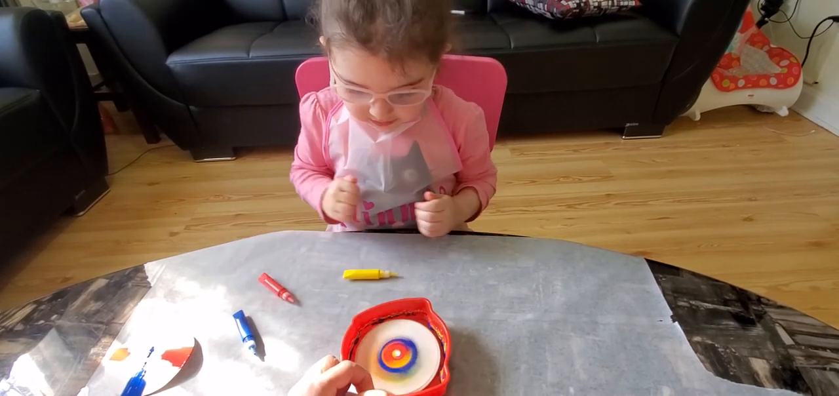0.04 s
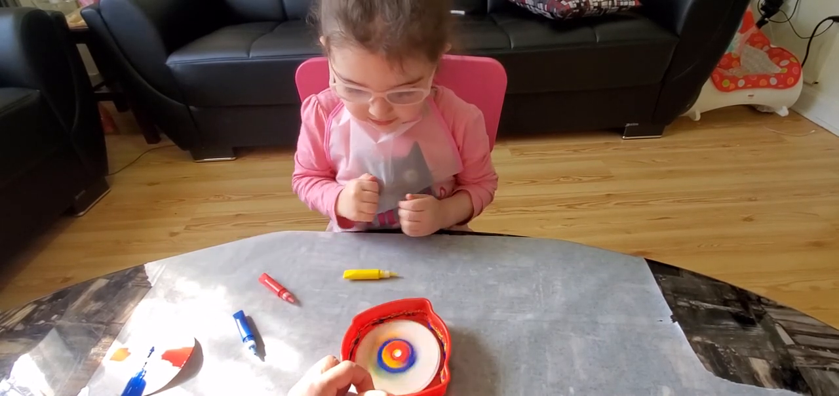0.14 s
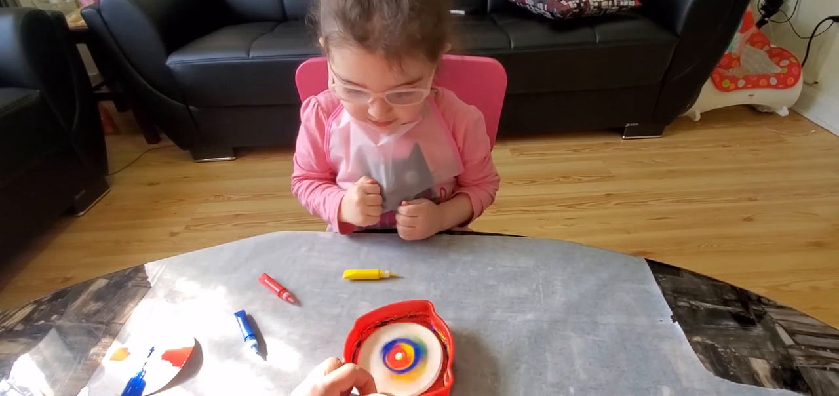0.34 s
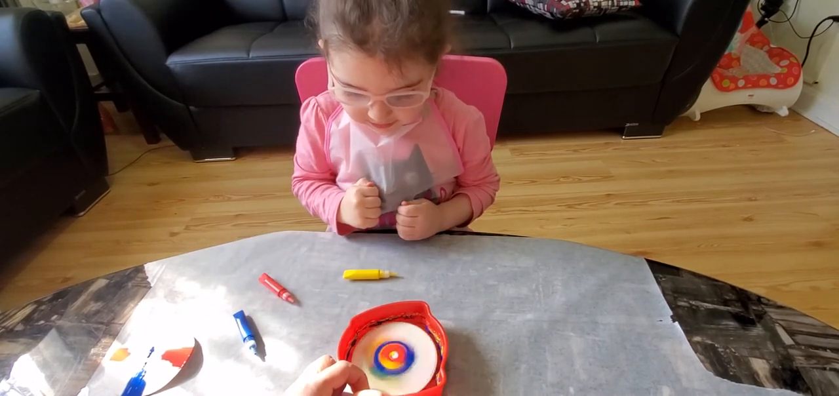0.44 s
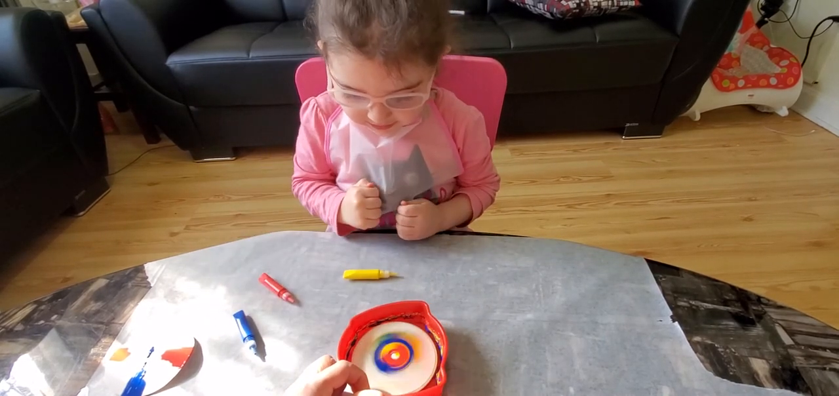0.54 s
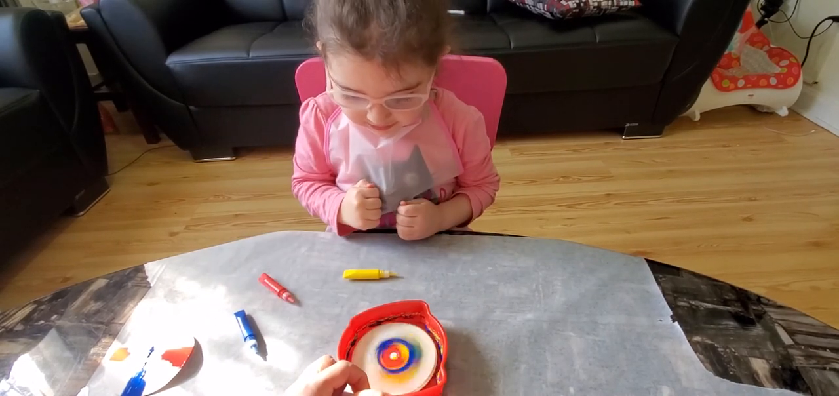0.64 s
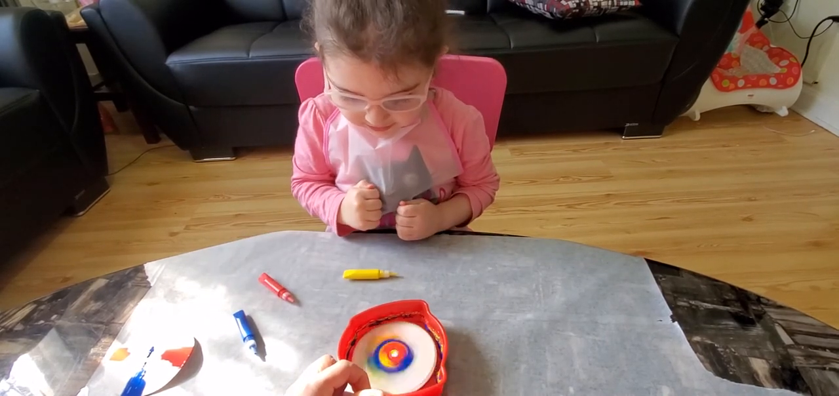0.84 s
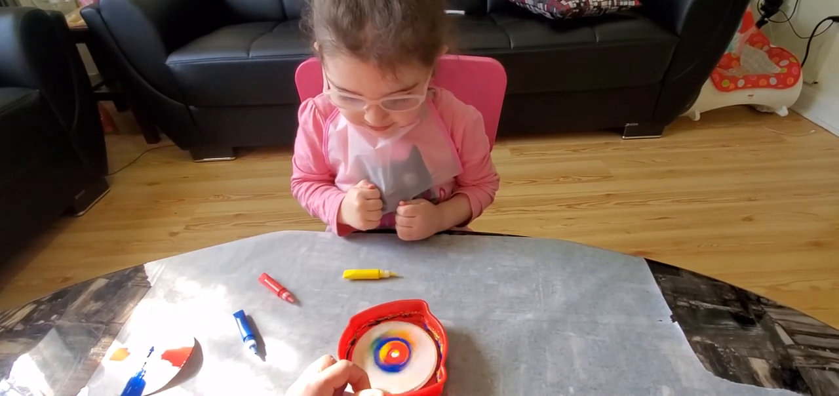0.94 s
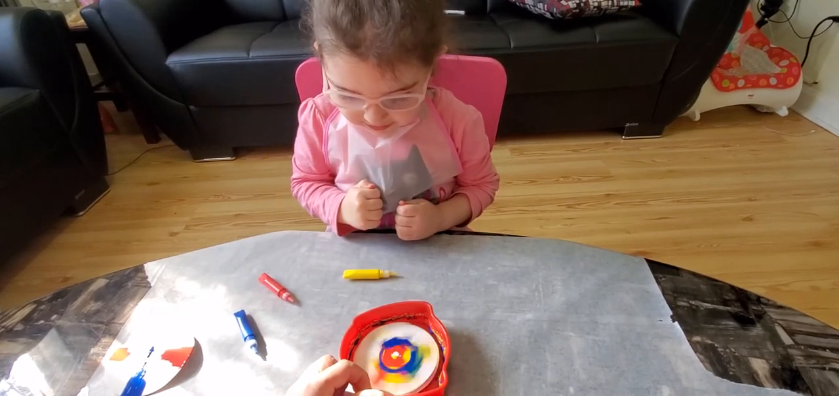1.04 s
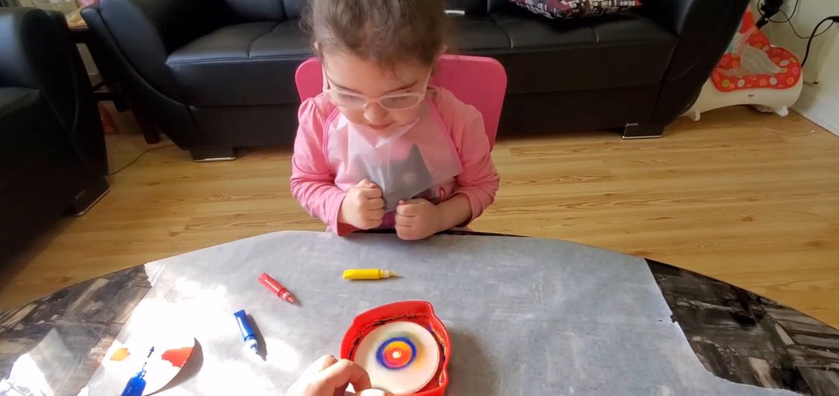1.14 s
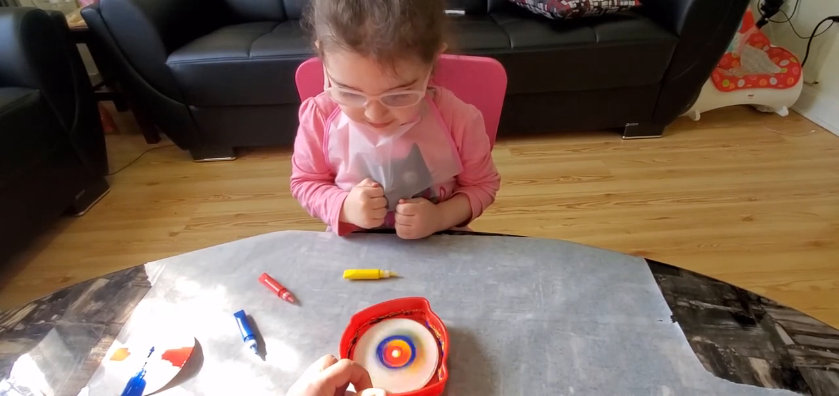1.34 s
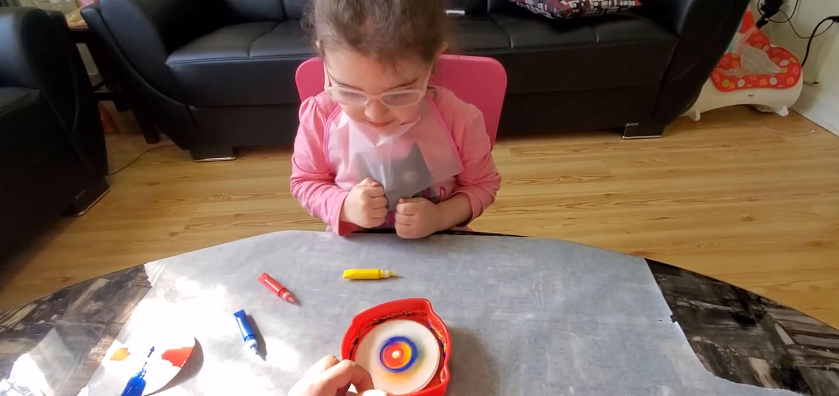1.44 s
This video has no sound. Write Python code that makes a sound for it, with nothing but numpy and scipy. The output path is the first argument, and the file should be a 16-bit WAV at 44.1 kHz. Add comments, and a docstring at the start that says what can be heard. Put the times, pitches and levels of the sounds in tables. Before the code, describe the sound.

A plastic spinning toy ticks faintly, close by in a quiet room. At about 0.2 seconds it gives a quick ratcheting rattle, then a sharp chattering clack at 0.35. Light ticks and a faint whir follow. Near 0.9 seconds it scrapes and ratchets again, ending in a snap and lighter clack around 1.1. The table thumps softly under both strokes, and faint ticking and whirring continue to about 1.5 seconds.

```python
"""Plastic spin-art toy

A plastic spin-art toy is driven twice on a table in a living room. Each stroke scrapes, a pawl rattles
over ratchet teeth that slow to a stop, and the drive clacks home. The table booms under the strokes, and
the card holder ticks and whirs in its loose bearing. Rough contact forces, made of shaped noise, ring
the plastic shell; decaying sines make the table; fading noise makes the room, over a faint hush.
"""
import sys
import numpy as np
from scipy import signal
from scipy.fft import rfft, irfft
from scipy.io import wavfile
from scipy.ndimage import map_coordinates

SR = 44100
rng = np.random.default_rng(int(sys.argv[2]) if len(sys.argv) > 2 else 0)


def to_wav(s):
    """Save 16-bit WAV."""
    ch = np.atleast_2d(s).T  # columns
    pcm = np.round(np.clip(ch, -1, 1) * 32767)  # PCM
    wavfile.write(sys.argv[1], SR, pcm.astype(np.int16))


N = 66150  # samples, 1.5 s

# level of the bearing's whir: time_s, level_db
WHIR_LEVEL = [(0, -56.5), (.17, -58.5), (.5, -55.5), (.6, -68), (.72, -54), (.84, -70.5), (1.0, -40.5),
              (1.27, -56.5), (1.34, -55.5), (1.4, -49.5), (1.45, -57.5), (1.5, -48)]
# the drive slides before it catches: start_s, end_s, level_db, rise_s
SLIDES = [(.196, .204, -37, .006), (.868, .941, -35.5, .04), (1.070, 1.135, -34.5, .022)]
# light knocks of the loose holder: start_s, level_db
HOLDER_TICKS = [(.003, -45.5), (.0164, -45), (.0573, -87), (.0952, -50), (.1131, -49.5), (.183, -47.5),
                (.504, -37), (.6252, -50.5), (.634, -49.5), (.6436, -45), (.6571, -49), (.6681, -42),
                (.691, -51), (.702, -42.5), (.7135, -56), (.7244, -43), (.7379, -39.5), (.8457, -54),
                (.8595, -56), (.8696, -50.5), (1.1192, -34), (1.2528, -55), (1.2887, -41.5), (1.3126, -43),
                (1.363, -43.5), (1.3914, -49), (1.4079, -55.5), (1.427, -47.5), (1.4578, -47),
                (1.4807, -46.5)]
# pushes on the table: start_s, relative_level_db, hardness_db_per_octave
TABLE_PUSHES = [(0.201, -64, -7), (0.221, -60, -6), (0.347, -49.5, -1), (0.394, -47, -12), (.895, -54, -17),
                (.940, -41, 2.5), (0.974, -44, 11), (1.143, -44.5, -12.5)]
# modes of the table top: pitch_hz, t60_s, relative_level_db
TABLE_MODES = [(68, 0.21, -23), (149.2, 0.26, -3.5), (169.2, 0.26, 2), (251, 0.092, -5), (332.5, .2, -9.5),
               (361.5, 0.34, -10)]
# ratchet runs: first_tooth_s, time_to_standstill_s, travel_teeth
RATCHET_RUNS = [(.2038, .0706, 10.15), (.9413, .0728, 7.35)]
# loudness of each run: level_db, change_over_run_db
RUN_LEVELS = [(-18, 4), (-21.5, 1.5)]
# the pawl drops over a single tooth: start_s, level_db
SINGLE_SNAPS = [(1.0098, -27), (1.1090, -19.5)]
# the drive hits its stop and chatters: start_s, level_db
STOP_CLACKS = [(.3326, -17.5), (.3358, -18), (.3396, -16.5), (.3432, -21.5), (.3468, -10.5), (.3500, -26),
               (.3675, -32), (1.1410, -22.5), (1.1442, -24.5)]

# resonances of the plastic shell: pitch_hz, t60_s, relative_level_db
SHELL_MODES = [(1235, .09, 5), (1620, .08, 3), (1806, .13, 10), (1878, .13, 9), (1968, .08, 5),
               (2400, .05, -2), (2677, .08, 3), (2852, .08, 6), (3270, .07, 1), (3650, .07, 2)]
# tone colour of the ratchet teeth: frequency_hz, relative_level_db
TOOTH_COLOUR = [(30, -28), (110, -25.5), (200, -16), (350, -23), (650, -22), (1100, -4.5), (1800, 3),
                (2300, 1.5), (3000, 2.5), (4700, -1), (5600, -0.5), (7800, -9.5), (8900, -18.5),
                (12000, -16.5)]
# tone colour of the clacks: frequency_hz, relative_level_db
CLACK_COLOUR = [(30, -55), (120, -38), (300, -25), (650, -19), (1300, -3), (2200, -3), (3400, 1),
                (5600, -3), (8300, -9), (9300, -20), (12000, -22)]
# tone colour of the ticks: frequency_hz, relative_level_db
TICK_COLOUR = [(30, -57), (120, -27.5), (350, -12), (700, -13.5), (1200, -3.5), (2000, -3.5), (3000, -10),
               (6000, -8.5), (8000, -18), (9300, -33.5), (12000, -25)]
# tone colour of the rubbing: frequency_hz, relative_level_db
SCRAPE_COLOUR = [(30, -39), (120, -16.5), (350, -13), (650, -13.5), (1200, -3), (2100, -2.5), (3000, -8),
                 (5600, -12.5), (8000, -18.5), (9300, -29), (12000, -17.5)]
# tone colour of the quiet room: frequency_hz, relative_level_db
HUSH_COLOUR = [(25, -6), (60, 6.5), (110, -17), (160, 10), (300, -17), (1000, -8.5), (5000, -35.5),
               (15500, -27)]
# extra treble of hard contacts, at unit force: frequency_hz, relative_level_db
CRACK_COLOUR = [(2000, -28.5), (5000, -9), (9000, 6), (15000, 19.5)]
# balance of the toy between the sides: frequency_hz, left_minus_right_db
LEFT_BALANCE = [(300, 0), (500, -2), (1000, 6), (1800, 3), (3000, -3), (4500, -1), (7000, 1), (10000, 5),
                (15000, 8)]
# likeness of left and right noise: frequency_hz, likeness (1 = the same)
STEREO_LIKENESS = [(150, 0.96), (300, 0.88), (600, 0.57), (1500, 0.1), (4000, 0.24), (12000, 0.15)]
# decay of the reverberation: frequency_hz, t60_s
ROOM_DECAY = [(150, 0.86), (1000, 0.35), (2000, 0.46), (4000, 0.35), (8000, 0.32), (15000, 0.27)]

BITE_DB, GRAZE_DB = 3, -5  # the first tooth bites hard and throws the pawl, which only grazes the second
TOOTH_ATTACK_S, CLACK_ATTACK_S, TICK_ATTACK_S = .0003, .0004, .0005
TOOTH_HOLD_S, CLACK_HOLD_S, TICK_HOLD_S = .002, .002, .0015
TOOTH_T60_S, CLACK_T60_S, TICK_T60_S = .011, .018, .0094
ROOM_DB, ROOM_DELAY_S, LEFT_LEAD_S = -8, 0.0025, 0.000116
ROOM_SIDE_SHARE = 0.29  # share of the left-right level difference that the reverberation keeps
HUSH_DB = -66.5
TOP_HZ, FALL_DB_PER_HZ = 15750, .045  # band limit and the slope above it


def amp(db):
    """Decibels to amplitude."""
    return 10 ** (np.asarray(db) / 20)


def unit(x):
    """Divide by the root of the mean square."""
    return x / np.sqrt(np.mean(x ** 2) + 1e-20)


def clock():
    """Time of every sample in seconds."""
    return np.arange(N) / SR


def along(points, hz):
    """Read a curve of (Hz, value) points on a log frequency axis."""
    point_hz, values = np.transpose(points)
    return np.interp(np.log(hz + 1), np.log(point_hz + 1), values)


def filtered(x, response):
    """Shape x with a complex response, given as a function of frequency."""
    spectrum = rfft(x, 2 * N)
    hz = np.fft.rfftfreq(2 * N, 1 / SR)
    return irfft(spectrum * response(hz))[..., :N]


def causal(gain):
    """The minimum-phase response with this gain, by folding its cepstrum."""
    cepstrum = irfft(np.log(gain + 1e-6))
    cepstrum[1:N] *= 2
    cepstrum[N + 1:] = 0
    return np.exp(rfft(cepstrum))


def noise():
    """White stereo noise, alike in the bass: the mid and side shares set the likeness."""
    def mid_side_gains(hz):
        turn = np.arccos(np.clip(along(STEREO_LIKENESS, hz), -1, 1)) / 2
        return np.array([np.cos(turn), np.sin(turn)])
    mid, side = filtered(rng.standard_normal((2, N)), mid_side_gains)
    return np.array([mid + side, mid - side])


def plastic(force, colour, ring_db):
    """A rough contact force sounds through the shell and its resonances; harder contact is brighter."""
    def shell_response(hz):
        peaks = 0
        for mode_hz, t60, db in SHELL_MODES:
            detune = (hz - mode_hz) * 2 * np.pi * t60 / np.log(1000)  # in half bandwidths
            peaks = peaks + amp(db + ring_db) ** 2 / (1 + detune ** 2)
        return unit(causal(amp(along(colour, hz)) * np.sqrt(1 + peaks)))
    bright = filtered(noise(), lambda hz: amp(along(CRACK_COLOUR, hz)))
    crack = force ** 2 * bright
    return filtered(force * noise() + crack, shell_response)


def contacts(rows, attack_s, hold_s, t60):
    """Force of (s, dB) contacts: attack, hold, fast release; overlapping contacts add in power."""
    power = np.zeros(N)
    for start, db in rows:
        age = clock() - start
        attack = np.clip(age / attack_s, 0, 1)
        release_db = -60 * np.maximum(age - hold_s, 0) / t60
        power += (attack * amp(db + release_db)) ** 2
    return np.sqrt(power)


def friction(grain_db=3.5, grains_per_s=500, release_s=.02):
    """Grainy rubbing of the bearing and of the sliding drive: noise under a randomly wavering level."""
    t = clock()
    level = amp(np.interp(t, *np.transpose(WHIR_LEVEL)))
    for start, end, db, rise in SLIDES:
        swell = np.clip((t - start) / rise, 0, 1) ** 2
        level = level + amp(db - 60 * np.maximum(t - end, 0) / release_s) * swell
    wander = map_coordinates(rng.standard_normal(N // 10), [t * grains_per_s], mode="wrap")
    grain = unit(amp(grain_db * wander))
    return plastic(level * grain, SCRAPE_COLOUR, ring_db=-12)


def hush():
    """The quiet of the room: steady coloured noise."""
    return amp(HUSH_DB) * unit(filtered(noise(), lambda hz: amp(along(HUSH_COLOUR, hz))))


def ticks():
    """The holder knocks in its play: short, light contact forces on the shell."""
    force = contacts(HOLDER_TICKS, TICK_ATTACK_S, TICK_HOLD_S, TICK_T60_S)
    return plastic(force, TICK_COLOUR, ring_db=1.5)


def table(attack_s=0.007, centre_hz=160):
    """Each push sets the table top booming in decaying sines; harder ones favour its higher modes."""
    out = np.zeros(N)
    for start, db, hardness in TABLE_PUSHES:
        age = np.maximum(clock() - start, 0)
        for hz, t60, mode_db in TABLE_MODES:
            tilt_db = hardness * np.log2(hz / centre_hz)
            gain = amp(db + mode_db + tilt_db - 60 * age / t60)
            swell = 1 - np.exp(-age / attack_s)
            out += gain * swell * np.sin(2 * np.pi * (hz * age + rng.random()))
    return 2 * out


def ratchet():
    """The wheel brakes evenly, so the pawl's snaps come ever further apart."""
    teeth = list(SINGLE_SNAPS)
    for (start, length, travel), (db, change_db) in zip(RATCHET_RUNS, RUN_LEVELS):
        tooth_numbers = np.arange(int(travel) + 1)
        time_shares = 1 - np.sqrt(1 - tooth_numbers / travel)  # constant deceleration
        for k, share in enumerate(time_shares):
            accent_db = BITE_DB * (k == 0) + GRAZE_DB * (k == 1)
            teeth.append((start + length * share, db + change_db * share + accent_db))
    force = contacts(teeth, TOOTH_ATTACK_S, TOOTH_HOLD_S, TOOTH_T60_S)
    return plastic(force, TOOTH_COLOUR, ring_db=0.5)


def clacks():
    """Blows against the stop chatter in two quick clusters, the second lighter and duller."""
    force = contacts(STOP_CLACKS, CLACK_ATTACK_S, CLACK_HOLD_S, CLACK_T60_S)
    return plastic(force, CLACK_COLOUR, ring_db=-1)


def room(x):
    """Diffuse answer of the room: a tail of noise whose bass lingers longest."""
    hz, t, cells = signal.stft(noise(), SR, nperseg=256)
    decay = amp(-60 * t / along(ROOM_DECAY, hz)[:, None])
    tail = signal.istft(cells * decay, SR, nperseg=256)[1]
    # silent for one delay, then fading in over another
    tail = tail * np.clip(np.arange(tail.shape[1]) / SR / ROOM_DELAY_S - 1, 0, 1)
    return signal.fftconvolve(x, tail / np.linalg.norm(tail[0]), axes=1)[:, :N]


def scene():
    """The toy stands just left of the microphones, in a quiet room."""
    toy = friction() + ticks() + ratchet() + clacks()
    sides = np.array([[.5], [-.5]])  # left, right

    def placement(hz):
        lead = np.exp(2j * np.pi * hz * sides * LEFT_LEAD_S)  # the left hears it first
        return amp(sides * along(LEFT_BALANCE, hz)) * lead

    def room_balance(hz):
        return amp(ROOM_DB + ROOM_SIDE_SHARE * sides * along(LEFT_BALANCE, hz))

    direct = filtered(toy, placement)
    walls = filtered(room(toy), room_balance)
    return direct + walls + table() + hush()


def record(dry):
    """The loudest peaks are rounded off; the sound falls steeply above the band limit."""
    rounded = dry / (1 + dry ** 4) ** (1 / 4)
    return filtered(rounded, lambda hz: amp(-FALL_DB_PER_HZ * np.maximum(hz - TOP_HZ, 0)))


dry = scene()
out = record(dry)
to_wav(out)
```